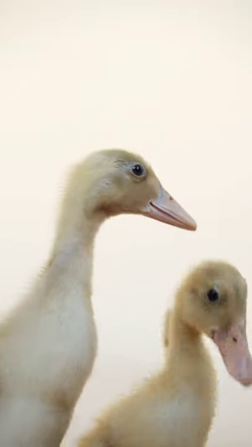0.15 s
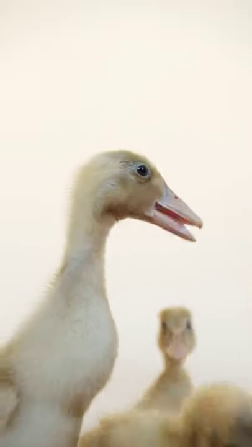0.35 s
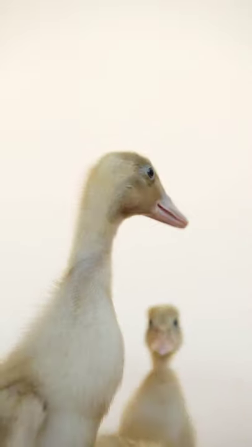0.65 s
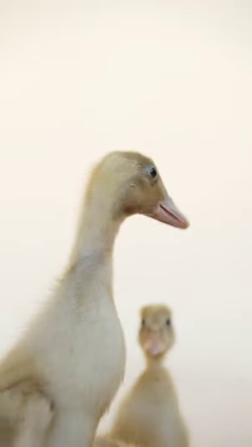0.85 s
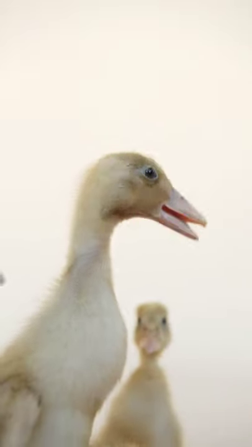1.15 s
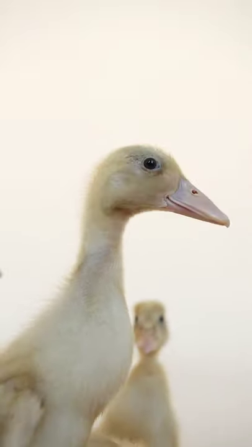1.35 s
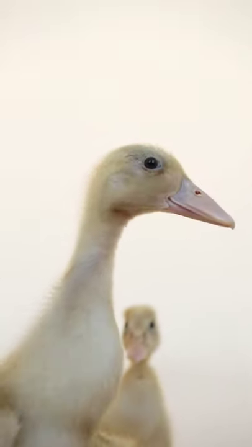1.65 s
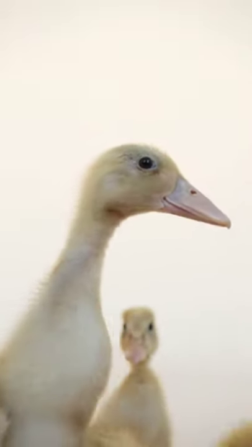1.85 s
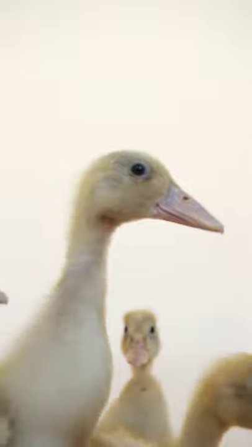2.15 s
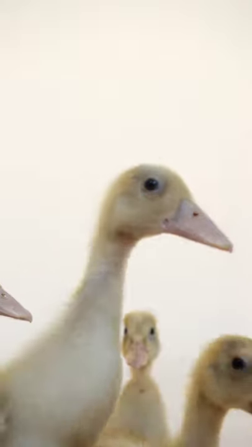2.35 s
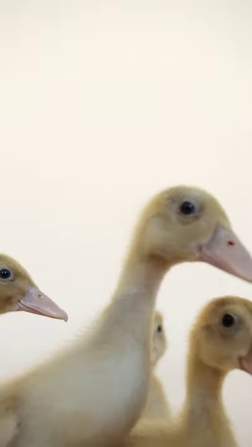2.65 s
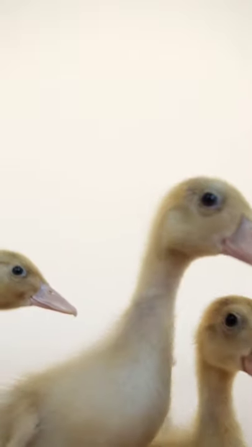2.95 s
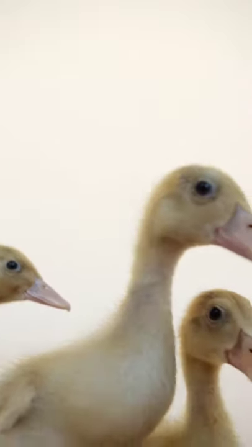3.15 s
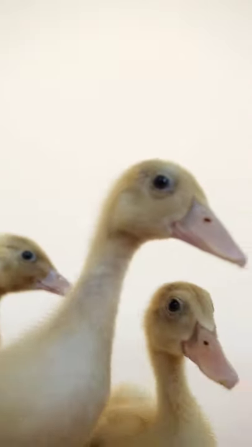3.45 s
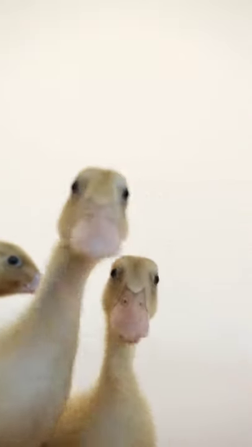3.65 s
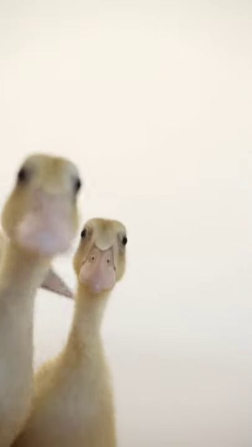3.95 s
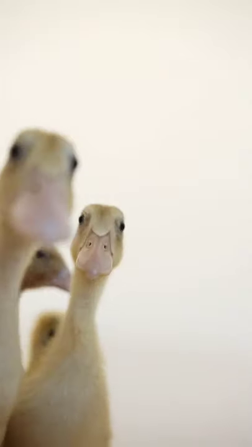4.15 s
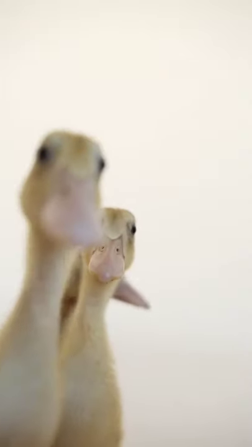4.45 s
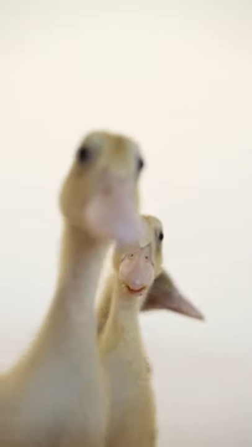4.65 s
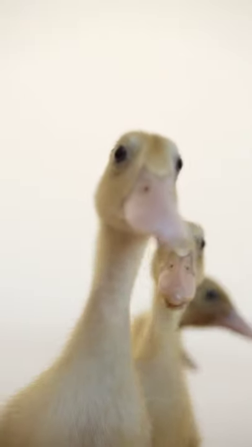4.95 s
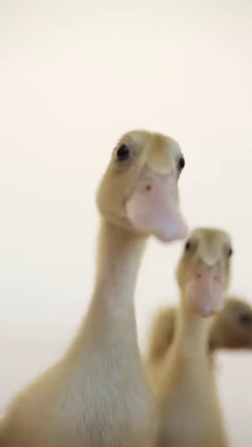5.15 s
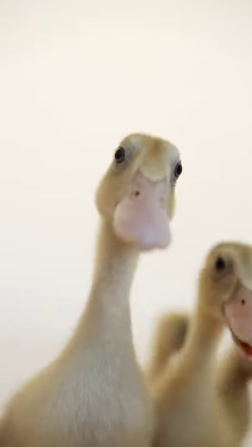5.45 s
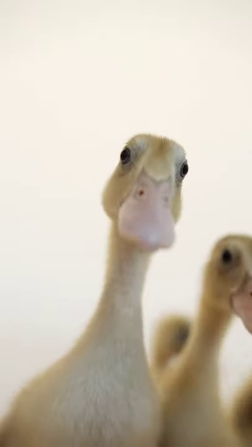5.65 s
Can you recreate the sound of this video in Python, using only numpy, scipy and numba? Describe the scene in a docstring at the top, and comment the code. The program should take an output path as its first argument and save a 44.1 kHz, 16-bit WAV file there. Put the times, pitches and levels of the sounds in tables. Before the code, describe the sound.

Young ducks call close to a cheap, overloaded microphone, with a very short reflection from nearby walls and faint mains hum beneath. From 0 s a hoarse, breathy rasp swells over soft rustling, followed by short clucks near 0.4 and 0.5 s, a quick falling peep at 0.5 s and thin, high far-off peeps until about 1.1 s. A longer rasp starts near 1.3 s, with a bright, loud short peep at 1.4 s. A drawn-out cluck at 1.7 s leads to weaker rasps and two small clucks around 2.1 and 2.2 s. The rustle cuts off at 2.4 s. One duck quacks at 2.7 s, pauses, then from 3.3 s repeats nasal, reedy quacks about four times a second, gradually softer and shorter, until just after 5.7 s. Two faint peeps and a touch of rustle sit around 3.9 s. The calls sound gritty, with crunchy digital edges.

```python
"""A few ducks close to a cheap recorder: hoarse rasps, clucks and peeps over a rustling yard open the scene.
The rustle breaks off, then comes one duck's even run of quacks, with two faint peeps and a touch of rustle amid it.
Pulses from the syrinx (a bird's voice box) ring throat and beak; peeps are whistled tones, the rustle is noise.
All through, the amplifier overloads unevenly, the converter holds each sample four times and mains hum lies below.
"""
import sys
import numpy as np
from scipy import signal
from scipy.fft import rfft, irfft
from scipy.io import wavfile
from scipy.ndimage import uniform_filter1d
from numba import njit

SR = 44100
rng = np.random.default_rng(int(sys.argv[2]) if len(sys.argv) > 2 else 0)


def log_audio(samples):
    """Write samples as a 16-bit WAV file to the path given in sys.argv[1]."""
    # one column per channel
    frames = np.atleast_2d(samples).T
    # limit to full scale, then quantise
    limited = np.clip(frames, -1, 1)
    pcm = np.round(limited * 32767).astype(np.int16)
    wavfile.write(sys.argv[1], SR, pcm)


N = 256206  # samples in the scene

# fixed throat resonances of quacks and clucks: [f/Hz, width of one pass/Hz, level/dB against the beak]
BRIGHT_THROAT = [(980, 200, -17), (1340, 200, -7), (2850, 300, -24), (3300, 400, -24), (3800, 600, -22)]
BRIGHT_BEAK_WIDTH_HZ, BRIGHT_UPPER_WIDTH_HZ = 418, 576


def scene():
    """All ducks stand in front of one microphone; the walls return the calls, and the yard is added after."""
    calls = quacks() + clucks() + rasps() + whistles()
    mono = pen(calls) + yard()
    return np.array([mono, mono])


def quacks():
    """One duck's even run: strong pulses through a bright throat, each call led in by a faint swell of noise."""
    # one row a quack: [start t/s, voiced length t/s, swell t/s, release t/s,
    #   opening, swelled and closing level/dB, mid-call dip level/dB, opening, middle and closing pulse f/Hz,
    #   opening, middle and closing beak f/Hz, upper resonance f/Hz, its middle and closing level/dB,
    #   opening and middle roughness/0-1]
    quack_rows = [ (2.664, 0.11, 0.077, 0.027, -25, -9.5, -19.5, 1.5, 161.9, 184.8, 175.4, 1617, 1620, 2086, 2480, -12.5, -18, .3, .5),
                  (3.278, 0.098, 0.055, 0.028, -21, -11.5, -16, 0.5, 168.6, 196.9, 190.4, 1656, 1800, 1930, 2520, -10, -6.5, 1, .6),
                  (3.495, 0.12, .04, 0.032, -17, -8.5, -17, 1.5, 175.4, 209.1, 207, 1850, 1785, 1960, 2305, -2, -10.5, 0.92, .6),
                  (3.732, 0.1, 0.041, 0.042, -13, -11.5, -13.5, -2.5, 158.7, 198.5, 199.9, 1825, 1876, 1930, 2385, -10, -19, 1, 0.28),
                  (3.972, 0.1, .018, 0.043, -19.5, -12, -13.5, -2.5, 170.6, 193, 192.4, 1814, 1940, 1925, 2450, -16, -20.5, 0.94, .6),
                  (4.221, 0.096, 0.0072, 0.05, -19, -12.5, -15.5, 0, 152.2, 187.7, 188.8, 1860, 1730, 1886, 2320, -4.5, -14, .85, .55),
                  (4.468, .08, .008, 0.052, -13, -12.5, -11.5, 3.5, 156.7, 189.1, 190, 1866, 1845, 1800, 2200, -3.5, -14.5, .85, .6),
                  (4.717, 0.077, .012, 0.053, -15, -13.5, -14, 1, 159.3, 184.9, 192.9, 1773, 1980, 1920, 2210, -7.5, -15, .9, .45),
                  (4.961, .078, .01, 0.032, -16, -16.5, -17, -1.5, 158.2, 186.1, 196.5, 1790, 1877, 1790, 2260, -1.5, -18.5, .9, 0.34),
                  (5.202, 0.063, 0.012, 0.035, -15.5, -13.5, -14, 6, 153, 180, 199.1, 1740, 1840, 1850, 2350, -5, -13, .85, 0.18),
                  (5.44, 0.067, 0.013, 0.032, -21.5, -17.5, -18.5, 3.5, 154.6, 180.6, 184.5, 1841, 1838, 1924, 2453, -6.5, -11, 0.59, .8),
                  (5.688, 0.051, 0.0066, 0.028, -21.5, -18.5, -20.5, 1, 152, 169.9, 176, 1810, 1820, 1970, 2320, -7, -7.5, 0.83, .75),
                  ]
    # how all quacks end and change: [fall by half the release level/dB, by its end level/dB,
    #   upper resonance at the opening level/dB, after the release level/dB, closing roughness/limited to 0-1]
    quack_habit = 18, 46, -9, -5, 1.09
    run = shaped(quack_rows, *quack_habit)
    voiced = voice(run, BRIGHT_THROAT, BRIGHT_BEAK_WIDTH_HZ, BRIGHT_UPPER_WIDTH_HZ,
                   jitter=.07, scatter=.3, second=.8, air=.6)
    return voiced + lead_in(run)


def lead_in(calls):
    """A faint swell of noise rises just before each call is voiced."""
    longest_s, growth_s, level_db = .03, 0.0056, -28.5
    t = np.arange(N) / SR
    swell = np.zeros(N)
    for call in calls:
        since = t - call[0][0]
        swell += (since < 0) * (since > -longest_s) * np.exp(np.minimum(since, 0) / growth_s)
    air = unit(svf(rng.standard_normal(N), np.full(N, 1900.), 2100.0))
    return undb(level_db) * swell * air


def clucks():
    """Mostly short calls through the same bright throat as the quacks, with less even timing and more air."""
    # one row a cluck: [start t/s, voiced length t/s, swell t/s, release t/s,
    #   opening, swelled and closing level/dB, mid-call dip level/dB, opening, middle and closing pulse f/Hz,
    #   opening, middle and closing beak f/Hz, upper resonance f/Hz, its middle and closing level/dB,
    #   opening and middle roughness/0-1]
    cluck_rows = [ (0.359, 0.016, 0.023, 0.0073, -27, -22, -18.5, 0.0038, 206.4, 201.4, 206, 1780, 1800, 1740, 2400, -17, -20, 0.85, 0.71),
                  (0.515, 0.032, 0.031, 0.0076, -22, -19, -14, 0, 165.6, 164.6, 160.4, 1660, 1630, 1676, 2450, -6, -8, 0.91, .5),
                  (1.71, 0.16, 0.022, 0.019, -34.5, -19.5, -15.5, 0, 158, 181.6, 200, 1919, 1950, 1986, 2467, -5.5, -3, .55, 0.63),
                  (2.066, .022, 0.011, .008, -25.5, -24.5, -24, 0.011, 222.3, 199.3, 198.5, 1795, 1710, 1740, 2320, -12, -10, 0.84, 0.69),
                  (2.226, 0.021, 0.015, 0.017, -22.5, -17.5, -17.5, 0.0081, 184.3, 184.3, 184, 1850, 1960, 1965, 2500, -14, -11, 0.7, .4),
                  ]
    # how all clucks end and change: [fall by half the release level/dB, by its end level/dB,
    #   upper resonance at the opening level/dB, after the release level/dB, closing roughness/0-1]
    cluck_habit = 12.5, 15.5, -15.5, -6.5, .55
    return voice(shaped(cluck_rows, *cluck_habit), BRIGHT_THROAT, BRIGHT_BEAK_WIDTH_HZ, BRIGHT_UPPER_WIDTH_HZ,
                 jitter=0.15, scatter=0.13, second=0.98, air=0.84)


def rasps():
    """Hoarse calls: slow, unsteady pulses and plenty of air through a different throat."""
    # one row a rasp: [start t/s, voiced length t/s, swell t/s, release t/s,
    #   opening, swelled and closing level/dB, mid-call dip level/dB, opening, middle and closing pulse f/Hz,
    #   opening, middle and closing beak f/Hz, upper resonance f/Hz, its middle and closing level/dB,
    #   opening and middle roughness/0-1]
    rasp_rows = [ (0.0, .25, 0.14, .085, -17.5, -14.5, -22, -1.9, 103, 112.5, 117.7, 1820, 1930, 1860, 2663, -6.5, 0, 0.47, 0.71),
                 (0.555, .205, 0.057, 0.043, -29, -31.5, -25.5, -0.61, 100, 94.3, 92.3, 1810, 1850, 2040, 2830, -6.5, -13, .35, 0.69),
                 (1.12, 0.15, 0.035, 0.028, -45, -42, -33, 0.35, 103, 104.1, 100.9, 1960, 1900, 1820, 2680, -4, -8, 0.35, .5),
                 (1.264, .304, 0.14, 0.069, -22, -15, -19, 0, 99, 110.9, 122, 1710, 1776, 2010, 2850, -7.5, -6, .5, .5),
                 (1.88, .11, 0.068, 0.093, -24, -28, -28, -0.38, 101, 105.6, 113.6, 2115, 1950, 1920, 2670, -5, 5, .6, 0.74),
                 (2.095, 0.13, 0.058, .03, -43, -43, -35.5, -0.2, 92, 87.7, 89, 1720, 1590, 1780, 2500, -10, -12, 0.46, 0.6),
                 (2.262, 0.071, .052, .08, -35.5, -35, -33.5, 0.23, 95, 93.5, 92.4, 1640, 1580, 1360, 2600, -19, -25, .45, 0.45),
                 ]
    # how all rasps end and change: [fall by half the release level/dB, by its end level/dB,
    #   upper resonance at the opening level/dB, after the release level/dB, closing roughness/0-1]
    rasp_habit = 12.5, 27.5, -14, -14.5, 0.75
    # fixed throat resonances: [f/Hz, width of one pass/Hz, level/dB against the beak]
    hoarse_throat = [(930, 72, -28), (1285, 500, -22), (3500, 211.7, -15), (3900, 370, -34.5)]
    return voice(shaped(rasp_rows, *rasp_habit), hoarse_throat, beak_width_hz=478, upper_width_hz=410,
                 jitter=.2, scatter=.4, second=.7, air=3.)


def shaped(rows, halfway_db, release_db, upper_open_db, upper_end_db, rough_close):
    """Turn call rows into tables of t, level, pulse, beak and upper f, upper level and roughness over time."""
    middle = .5  # share of the voiced length
    ragged_end = 1  # roughness as a call dies away
    calls = []
    for start, length, swell, release, db0, db1, db2, dip_db, *hz, upper_hz, upper1, upper2, rough0, rough1 in rows:
        end = length + release
        stages = [0, middle * length, length, end]
        knees = [0, min(swell, length), length, length + release / 2, end]
        s = np.sort([*knees, stages[1]])

        def along(*values):
            return np.interp(s, stages[:len(values)], values)

        db = np.interp(s, knees, [db0, db1, db2, db2 - halfway_db, db2 - release_db])
        db = db - along(0, dip_db, 0)
        upper_db = along(upper_open_db, upper1, upper2, upper_end_db)
        rough = along(rough0, rough1, rough_close, ragged_end)
        columns = [start + s, db, along(*hz[:3]), along(*hz[3:]), upper_hz + 0 * s, upper_db, rough]
        calls.append(np.transpose(columns))
    return calls


def voice(calls, throat, beak_width_hz, upper_width_hz, jitter, scatter, second, air):
    """Roughness loosens the flaps, strengthens the second one and adds hissing air; all ring throat and beak."""
    on, (db, hz, beak_hz, upper_hz, upper_db, rough) = tracks(calls)
    rough = np.clip(rough, 0, 1)
    chance = rng.standard_normal((N // 40, 2))
    first, other, phase = flaps(on * hz, jitter * rough ** 2, scatter * rough, chance)
    # the root keeps the power of the pulses alike at any rate
    pulses = (first + second * rough * other) * np.sqrt(SR / hz)
    # the hiss bursts at the start of each cycle and fades through it
    hiss = unit(np.exp(-phase / .5) * rng.standard_normal(N))
    source = pulses + air * rough ** 2 * hiss * on

    sound = ring(source, beak_hz, beak_width_hz)
    sound -= undb(upper_db) * ring(source, upper_hz, upper_width_hz)
    for throat_hz, width_hz, throat_db in throat:
        sound -= undb(throat_db) * ring(source, throat_hz, width_hz)
    # a rough voice also spreads broadly past the resonances
    sound += undb(-15.5) * rough ** 3 * ring(source, 2600, 1200)

    # even out the power over a few cycles, so that the level column sets the loudness
    power_sum = uniform_filter1d(on * sound ** 2, size=1400)
    share_on = uniform_filter1d(on * 1., size=1400)
    power = power_sum / np.maximum(share_on, 1e-3)
    return on * undb(db) * sound / np.sqrt(np.abs(power) + 1e-9)


@njit
def flaps(hz, jitter, scatter, chance):
    """Two membrane flaps a cycle, each with its own timing and size; give first flaps, second flaps and phase."""
    pulses, phase = np.zeros((2, len(hz) + 1)), np.empty(len(hz))
    p, k = 0., 0  # progress to the next flap, and the flap count
    for i in range(len(hz)):
        step = 2 * hz[i] * max(1 + jitter[i] * chance[k, 0], .3) / SR
        p += step
        if step == 0:
            # between calls, stand ready to open the next call on a first flap
            p, k = 1., k | 1
        elif p >= 1:
            p, k = p - 1, k + 1
            size = np.exp(scatter[i] * chance[k, 1])
            # share the pulse between two samples, for timing finer than one sample
            pulses[k % 2, i] += size * p / step
            pulses[k % 2, i + 1] += size * (1 - p / step)
        phase[i] = (p + k % 2) / 2
    return pulses[0, :-1], pulses[1, :-1], phase


def ring(x, hz, width_hz):
    """A resonance applied twice, so its skirts fall steeply; the width is that of one pass."""
    hz = hz * np.ones(N)
    once = svf(x, hz, 1. * width_hz)
    return svf(once, hz, 1. * width_hz)


@njit
def svf(x, hz, width):
    """State-variable band-pass with a moving centre, gain 1 at the centre."""
    y, b, l = np.empty(len(x)), 0., 0.  # output, band and low-pass states
    for i in range(len(x)):
        g, k = np.tan(np.pi * hz[i] / SR), width / hz[i]
        # the tiny offset keeps the states from fading into very slow arithmetic
        v = (b + g * (x[i] + 1e-18 - l)) / (1 + g * (g + k))
        b, l, y[i] = 2 * v - b, l + 2 * g * v, k * v
    return y


def whistles():
    """Peeps of near, low and far voices, each kind with its own overtone and waver."""
    # near peeps: [start t/s, length t/s, loudest after t/s, opening, loudest and closing f/Hz, peak level/dB]
    near_rows = [ (0.49, 0.025, 0.013, 1490, 1626, 1677, -18),
                 (0.53, 0.055, 0.018, 1696, 1674, 1390, -10.5), (1.352, .025, .005, 1903, 1748, 1470, -16),
                 (1.379, 0.036, 0.013, 1865, 1825, 1650, -5.5),
                 (3.855, 0.071, 0.028, 1626, 2490, 1380, -35), ]
    # low peeps: [start t/s, length t/s, loudest after t/s, opening, loudest and closing f/Hz, peak level/dB]
    low_rows = [ (1.085, 0.026, .013, 975, 945, 911, -39.5), (3.905, 0.018, .008, 1016, 958, 906, -41), ]
    # far peeps: [start t/s, length t/s, loudest after t/s, opening, loudest and closing f/Hz, peak level/dB]
    far_rows = [ (0.3, 0.17, 0.029, 3550, 4270, 4200, -51.5), (0.39, 0.1, 0.034, 3650, 4300, 4340, -38.5),
                (0.79, 0.12, 0.04, 3994, 4380, 4250, -42), (0.85, 0.07, 0.016, 3570, 3500, 3300, -44),
                (1.03, 0.055, 0.0176, 4270, 4550, 3900, -40), (1.08, 0.039, 0.019, 3715, 3590, 3520, -47), ]
    near = peeps(arched(near_rows), overtone_db=-45, waver=.007)
    low = peeps(arched(low_rows), overtone_db=-4, waver=.03)
    far = peeps(arched(far_rows), overtone_db=-60, waver=.05)
    return near + low + far


def arched(rows):
    """Turn peep rows into tables of t, f and level for notes that curve to their loudest point and fade."""
    opens_db, closes_db = -13, -16  # against the peak
    bend_power = 1.3  # of the curve toward either end
    u = np.linspace(-1, 1, 9)  # -1 at the start, 0 at the loudest point, 1 at the end
    bend = np.abs(u) ** bend_power

    def side(before, after):
        return np.where(u < 0, before, after)

    notes = []
    for start, length, top, hz0, hz1, hz2, db in rows:
        s = start + top + u * side(top, length - top)
        hz = hz1 + side(hz0 - hz1, hz2 - hz1) * bend
        notes.append(np.transpose([s, hz, db + side(opens_db, closes_db) * bend]))
    return notes


def peeps(calls, overtone_db, waver):
    """Whistled notes with soft edges: a slightly unsteady tone and a partial half as high again."""
    on, (hz, db) = tracks(calls)
    turn = 2 * np.pi * np.cumsum(hz * (1 + waver * walk(200))) / SR
    edges = uniform_filter1d(on * undb(db), size=200)
    flutter = undb(2 * walk(250))
    partial = np.sin(3 * turn / 2)
    return np.sqrt(2) * edges * flutter * (np.sin(turn) + undb(overtone_db) * partial)


def pen(x):
    """Nearby walls return a short faint tail: the sound smeared by dying noise."""
    level_db, t60_s = -20, 0.075  # t60: the time to fall by 60 dB
    t = np.arange(SR // 8) / SR
    tail = unit(rng.standard_normal(len(t)) * undb(-60 * t / t60_s)) / np.sqrt(len(t))
    return x + undb(level_db) * signal.fftconvolve(x, tail)[:N]


def yard():
    """Distant rustle and chatter: noise whose low, middle and high parts waver apart."""
    # level of the two stretches of rustle, one table each: [t/s, level/dB]
    yard_levels = [
        [(0, -33.5), (.33, -41), (.44, -39), (.85, -48), (1.0, -50), (1.66, -42.5), (2.15, -45.5), (2.396, -49)],
        [(3.85, -48), (3.93, -47.5), (3.97, -46)],
    ]
    # tone colour of the noise before it is split into parts: [f/Hz, relative level/dB]
    yard_tone = [(350, -39.5), (600, -14), (679, -13), (756, -19), (986, -1), (1940, -3), (3440, -2),
                 (4340, -12), (5000, -1.5), (6500, -54), (11000, -120)]
    on, (db,) = tracks(yard_levels)
    noise = coloured(yard_tone)
    parts = np.zeros(N)
    for hz in (1000, 2000, 4000):
        parts += undb(2.5 * walk(25)) * ring(noise, hz, hz)
    soft_edges = uniform_filter1d(on * 1., size=300)
    return soft_edges * undb(db) * unit(parts)


def hum():
    """Mains lines, each a steady sine, over a low rumble of noise."""
    # mains hum and its overtones: [f/Hz, rms level/dB]
    mains_lines = [(50, -67), (100, -77), (200, -86), (300, -84), (400, -89), (600, -95)]
    # tone colour of the rumble: [f/Hz, relative level/dB]
    rumble_tone = [(15, -8.5), (40, -2.5), (120, -10.5), (300, -25.5), (700, -34.5), (1200, -62.5)]
    rumble_db = -68.5  # rms
    t = np.arange(N) / SR
    lines = np.zeros(N)
    for hz, db in mains_lines:
        lines += np.sqrt(2) * undb(db) * np.sin(2 * np.pi * (hz * t + rng.random()))
    return lines + undb(rumble_db) * coloured(rumble_tone)


def record(dry):
    """Thin microphone, lopsided overload, dull tape, sample-and-hold playback, hum on the line, steep top."""
    low_cut_hz, dull_hz, high_cut_hz, coupling_hz, top_hz = 690, 3760, 4393, 6.6, 15350
    skew, bend_power, ceiling = 0.88, 2.25, .52  # of the overload
    full_scale, hold = .47, 4  # converter limit, and samples in one held step

    x = signal.sosfilt(signal.butter(6, low_cut_hz, "high", fs=SR, output="sos"), dry)
    # both halves of the wave are pushed the same way: this turns the pulse envelope into bass and adds octaves
    x = x - skew * np.minimum(np.abs(x) ** bend_power, ceiling)
    # then the wave rounds off toward the ceiling
    x = x / (1 + (x / ceiling) ** 8) ** (1 / 8)
    x = signal.sosfilt(signal.butter(2, dull_hz, fs=SR, output="sos"), x)
    x = signal.sosfilt(signal.ellip(6, .3, 32, high_cut_hz, fs=SR, output="sos"), x)
    x = signal.sosfilt(signal.butter(1, coupling_hz, "high", fs=SR, output="sos"), x)
    # the converter chops the tallest peaks into broadband ticks
    x = np.clip(x, -full_scale, full_scale)
    # held steps mirror the band around a quarter of the sample rate
    x = np.repeat(x[:, ::hold], hold, axis=1)[:, :N]
    x = x + hum()
    return signal.sosfilt(signal.ellip(12, .2, 70, top_hz, fs=SR, output="sos"), x)


def tracks(calls):
    """Columns of all calls sample by sample, and a mask of when a call is on; a new call cuts the last one short."""
    t = np.arange(N) / SR
    ends = [call[0][0] for call in calls[1:]] + [t[-1] + 1]
    cut = []
    for call, end in zip(calls, ends):
        s, *columns = np.transpose(call)
        kept = np.minimum(s, end)
        cut.append(np.transpose([kept, *[np.interp(kept, s, column) for column in columns]]))
    s, *columns = np.vstack(cut).T
    on = sum((t >= call[0][0]) & (t < call[-1][0]) for call in calls) > 0
    return on, [np.interp(t, s, column) for column in columns]


def coloured(points):
    """Noise of rms 1 whose spectrum follows points of f/Hz and relative level/dB."""
    hz, db = np.transpose(points)
    bins = np.maximum(np.arange(N // 2 + 1) * SR / N, 1)
    gain = undb(np.interp(np.log(bins), np.log(hz), db, -120, -120))
    return unit(irfft(rfft(rng.standard_normal(N)) * gain, N))


def walk(rate):
    """Random levels of spread 1, a new one every 1 / rate seconds, joined by straight glides."""
    k = int(SR / rate)
    steps = np.repeat(rng.standard_normal(N // k + 1), k)
    return unit(uniform_filter1d(steps, k)[:N])


def undb(db):
    """Gain of a level in dB."""
    return 10 ** (np.asarray(db) / 20)


def unit(x):
    """Scale to rms 1."""
    return x / np.sqrt(np.mean(x ** 2))


dry = scene()
out = record(dry)
log_audio(out)
```